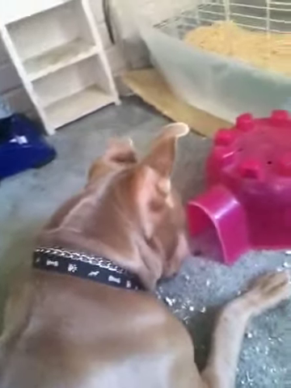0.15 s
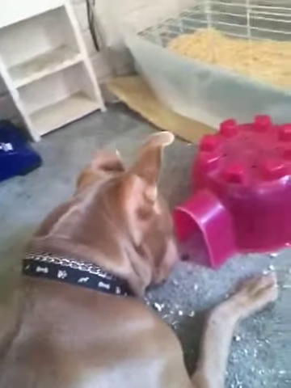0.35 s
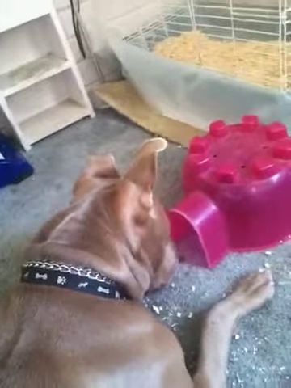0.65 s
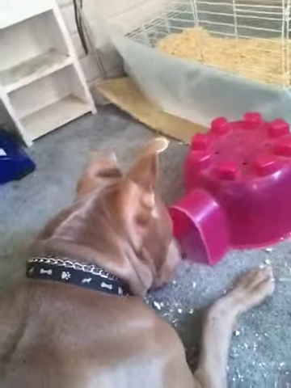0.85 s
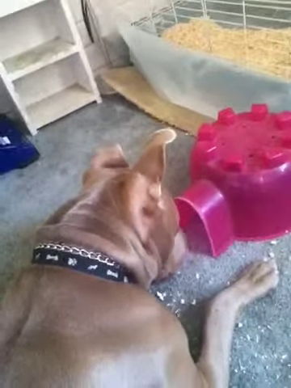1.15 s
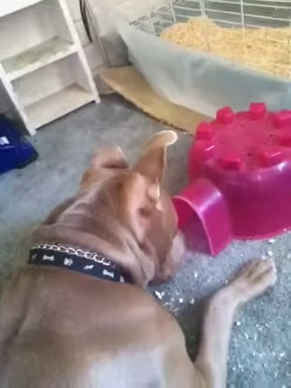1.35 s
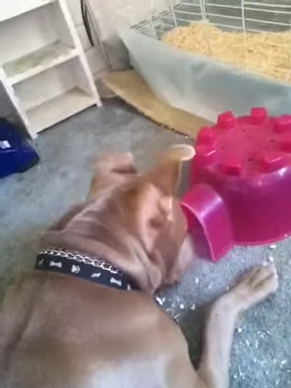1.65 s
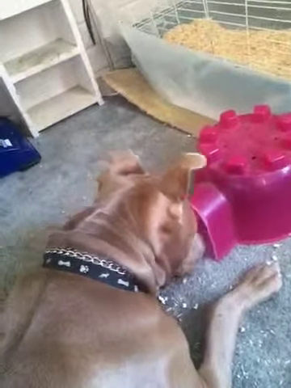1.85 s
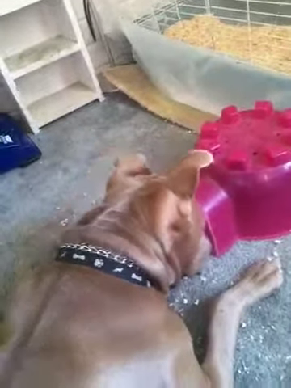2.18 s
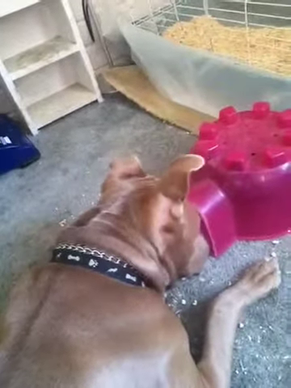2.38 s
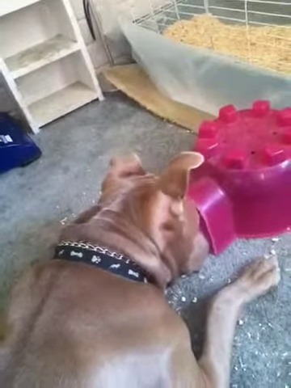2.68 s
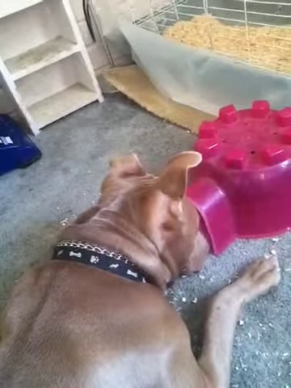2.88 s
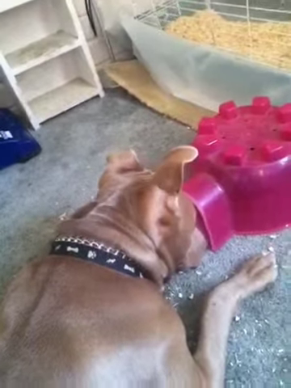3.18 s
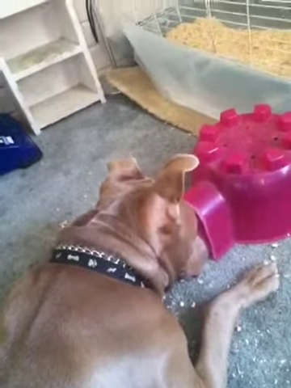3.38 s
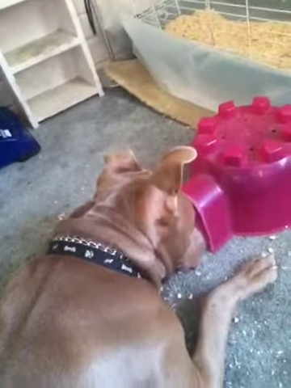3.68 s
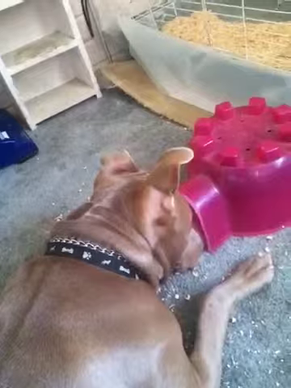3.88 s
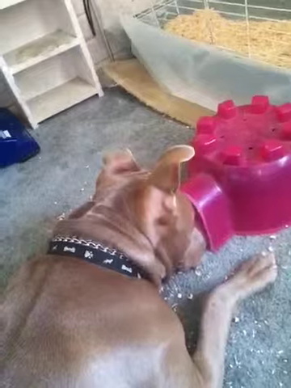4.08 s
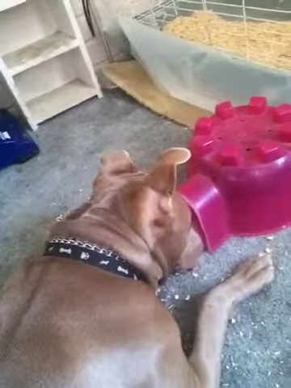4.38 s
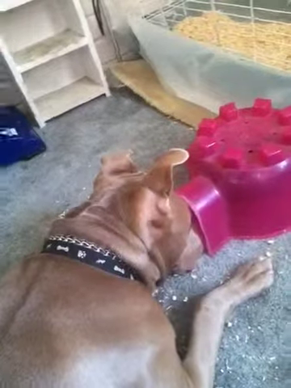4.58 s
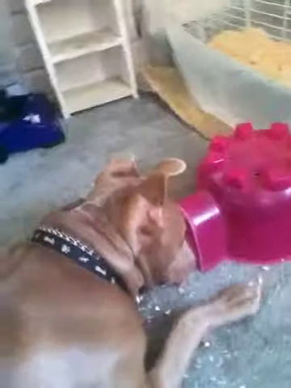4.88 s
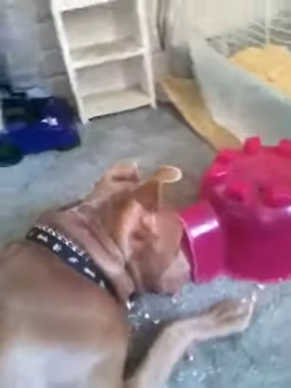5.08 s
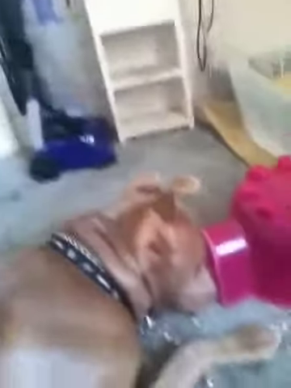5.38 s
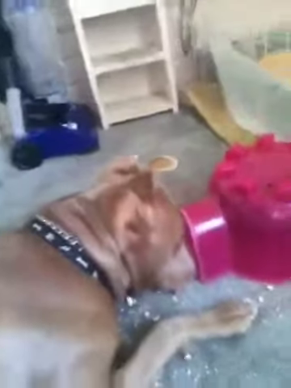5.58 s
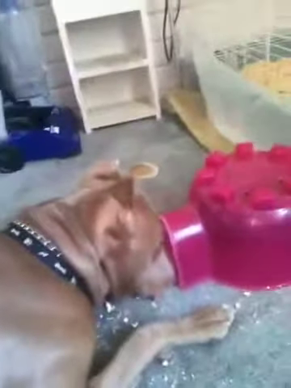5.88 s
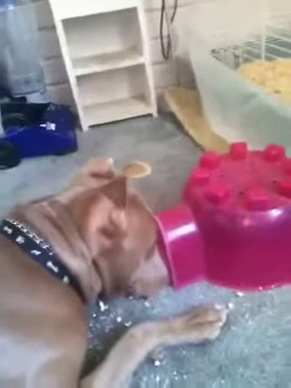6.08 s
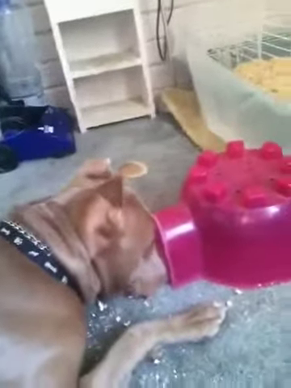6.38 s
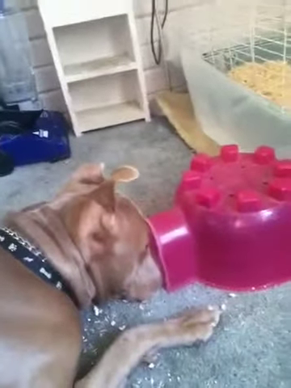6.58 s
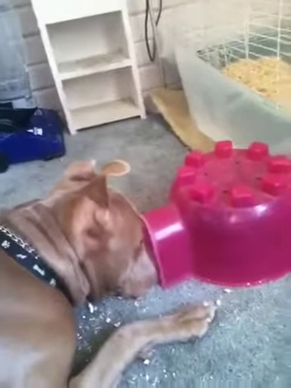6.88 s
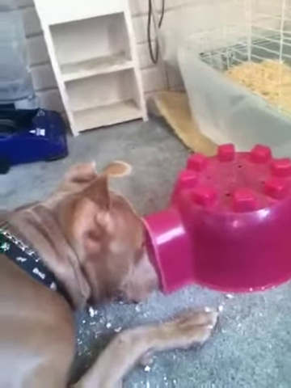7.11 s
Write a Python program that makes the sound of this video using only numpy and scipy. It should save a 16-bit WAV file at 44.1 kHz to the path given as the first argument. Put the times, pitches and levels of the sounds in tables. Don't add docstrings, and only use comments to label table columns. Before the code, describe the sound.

A low mains hum with a gentle throb about twice a second runs throughout, with soft fan air, slight hiss and a faint drone that swells and fades. A guinea pig inside a plastic hut calls in short bursts, coloured by a boxy ring and small hard room. Quiet whistles and chutters begin around 0.4 s, with two hoarse, breathy squeals at 0.75 to 0.9 s. A brighter cluster at 1.35 to 1.7 s peaks in a sharp falling whistle. Softer peeps come near 2.3 to 2.5 s, strong falling squeaks around 3.0 s, more at 3.85 to 4.05 s, and a loud tight group at 4.45 to 4.6 s. At 5.15 to 5.7 s the phone is handled: dry ticks, low knocks, cloth rustle, and the hum's balance shifts. Whistles return at 5.85 to 6.15 s, a faint tick at 6.35 s, then mostly hum with faint peeps near 7.15 s.

```python
import sys
import numpy as np
from scipy import signal
from scipy.fft import rfft, irfft, next_fast_len
from scipy.io import wavfile
from scipy.ndimage import uniform_filter1d

SR = 44100
rng = np.random.default_rng(int(sys.argv[2]) if len(sys.argv) > 2 else 0)


def linear_from_db(decibels):
    return 10 ** (np.asarray(decibels, float) / 20)


def store_pcm(level_fs):
    pcm = np.round(np.clip(level_fs, -1, 1) * 32767).astype(np.int16)
    wavfile.write(sys.argv[1], SR, np.atleast_2d(pcm).T)


N = 319715


def shape(x, points):
    hz, db = np.transpose(points)
    size = next_fast_len(len(x))
    f = np.maximum(np.fft.rfftfreq(size, 1 / SR), 1)
    gain = linear_from_db(np.interp(np.log(f), np.log(hz), db))
    return irfft(rfft(x, size) * gain, size)[:len(x)]


def unit(x):
    return x / np.sqrt(np.mean(x ** 2))


def band(x, lo_hz, hi_hz):
    return signal.sosfilt(signal.butter(4, [lo_hz, hi_hz], "bandpass", fs=SR, output="sos"), x)


def walk(rate_hz):
    k = max(int(SR / rate_hz), 2)
    smooth = uniform_filter1d(rng.standard_normal(N), k)
    return unit(uniform_filter1d(smooth, k))


def motor():
    buzz_hz, slip_hz, first_dip_s = 120.01, 1.92, .74
    # (multiple of the buzz, level before the phone moves [dB], level after [dB],
    # throb depth [0-1], throb lag [turns])
    hum_lines = [(1, -56, -55, 0.24, 0.), (2, -55, -56.5, 0.12, 0.089), (3, -59.5, -58.5, 0.15, 0.38),
                 (4, -68, -56, 0, 0), (5, -72, -85, 0.6, 0.026), (6, -69.5, -79, 0.07, 0.023),
                 (8, -75, -83, 0, 0.034), (9, -73.5, -72.5, 0, 0.082)]
    # (frequency [Hz], level [dB])
    whines = [(139.35, -69), (340.7, -73), (14998, -95)]
    t = np.arange(N) / SR
    moved = np.clip((t - 5.15) / 0.35, 0, 1)
    out = np.zeros(N)
    for k, before_db, after_db, depth, lag in hum_lines:
        turn = np.pi * (slip_hz * (t - first_dip_s) - lag)
        dips = 1 - 3.2 * np.cos(turn) ** 6
        throb = 1 + depth * (1 - .3 * moved) * dips
        db = before_db + (after_db - before_db) * moved + 1.1 * walk(18)
        out += linear_from_db(db) * throb * np.sin(2 * np.pi * k * buzz_hz * t)
    for hz, db in whines:
        out += linear_from_db(db + 2.9 * walk(8.9)) * np.sin(2 * np.pi * hz * t)
    return np.sqrt(2) * out


def air():
    # (frequency [Hz], density [dB per Hz])
    air_colour = [(25, -29.5), (55, -24), (95, -14), (160, -4), (260, 0), (420, -4), (650, -7), (1000, -8),
                  (1600, -14), (2400, -19), (3500, -19), (4300, -28), (7000, -28.5), (10500, -37.5),
                  (15400, -46.5)]
    low = shape(shape(rng.standard_normal(N), air_colour), [(700, 0), (1400, -30)])
    high = shape(shape(rng.standard_normal(N), air_colour), [(500, -4.5), (1000, -2)])
    return linear_from_db(-53.5) * unit(low * linear_from_db(.7 * walk(3)) + high * linear_from_db(.5 * walk(6.2)))


def rumble():
    # (peak time [s], half length [s], level [dB])
    drone_swells = [
        (.35, 0.39, -64),
        (.86, .1, -68),
        (1.8, 0.49, -69),
        (4.3, 0.98, -72),
        (5.3, .3, -67),
        (5.78, 0.23, -66.5),
        (6.85, .35, -69),
    ]
    t = np.arange(N) / SR
    level = np.full(N, linear_from_db(-81.5))
    for peak_s, half_s, db in drone_swells:
        level += linear_from_db(db) * np.exp(-((t - peak_s) / half_s) ** 2)
    hz = 86 + 2.5 * walk(6)
    return level * linear_from_db(2.5 * walk(9)) * np.sin(2 * np.pi * np.cumsum(hz) / SR)


def sag(rows, ratio):
    return [(s, length, hz, hz * ratio, db) for s, length, hz, db in rows]


def add_octave(rows, octave):
    octave_db_per_db, mean_effort_db = 0.18, -42.5
    # (time [s], overtone gain [dB])
    mouth = [(.4, -3.5), (.7, 1.5), (1.4, 0.5), (1.58, 2.5), (2.3, 0), (2.5, 0), (3.0, -4), (3.25, -5),
             (3.9, 2), (4.05, -7), (4.47, 0.5), (4.7, -12), (5.9, -1), (6.1, 0.5)]
    mouth_s, mouth_db = np.transpose(mouth)
    hz, octave_db = np.transpose(octave)
    out = []
    for s, length, first_hz, last_hz, db in rows:
        by_pitch = np.interp((first_hz + last_hz) / 2, hz, octave_db)
        by_effort = octave_db_per_db * (db - mean_effort_db)
        by_mouth = np.interp(s, mouth_s, mouth_db)
        out.append((s, length, first_hz, last_hz, db, by_pitch + by_effort + by_mouth))
    return out


def voice(calls, first_shake, wobble, shake_hz, flutter_db, third_db, air_db):
    # (frequency [Hz], density [dB per Hz])
    breath_colour = [(900, -45.5), (1500, -36), (2300, -22.5), (3400, -6), (4100, -12.5), (4600, -8),
                     (6500, -6), (8500, -13.5), (11500, -24), (14500, -27)]
    shake, flutter = walk(shake_hz), flutter_db * walk(350)
    breath = unit(shape(rng.standard_normal(N), breath_colour))
    out = np.zeros(N)
    for s, length, first_hz, last_hz, db, octave_db in calls:
        i = int(s * SR)
        n = min(int(length * SR), N - i)
        here = slice(i, i + n)
        u = np.arange(n) / n
        loose = np.minimum(first_shake + 2.6 * u, 1)
        hz = first_hz + (last_hz - first_hz) / (1 + np.exp(-7.5 * (u - .48)))
        phase = 2 * np.pi * np.cumsum(hz * (1 + wobble * loose * shake[here])) / SR
        overtones = np.sin(2 * phase) + linear_from_db(third_db) * np.sin(3 * phase)
        tone = np.sin(phase) + linear_from_db(octave_db) * overtones
        sung = np.sqrt(2) * linear_from_db(loose * flutter[here]) * tone
        swell = np.sin(np.pi * u ** 0.76) ** 0.68
        out[here] += linear_from_db(db) * swell * (sung + linear_from_db(air_db) * loose * breath[here])
    return out


def whistles():
    # (start [s], length [s], first pitch [Hz], last pitch [Hz], level [dB])
    slides = [(.355, .07, 3506, 2700, -47.5), (.668, .031, 1900, 1640, -49), (1.392, .041, 2520, 3040, -48),
              (1.47, .026, 1900, 1480, -50.5), (1.556, .049, 4195, 2998, -32.5),
              (1.635, .031, 2790, 2290, -48), (2.23, 0.0375, 2860, 3390, -64), (2.51, .05, 2460, 1430, -51),
              (2.956, .066, 2970, 2710, -53), (2.99, .047, 4080, 3280, -35), (3.078, .05, 2690, 2125, -43),
              (3.105, .028, 1820, 1120, -53.5), (3.845, .022, 4080, 3640, -42.5),
              (3.86, .05, 2474, 2920, -43.5), (3.993, .025, 3280, 2860, -46.5),
              (4.035, .065, 3270, 2395, -53.5), (4.455, .033, 3900, 2760, -39),
              (4.462, .043, 3592, 3048, -35.5), (4.505, .064, 3523, 2858, -36),
              (4.55, .043, 2333, 1595, -49.5), (5.84, .067, 3850, 2560, -44),
              (5.925, .033, 2730, 2204, -43), (5.965, .036, 1750, 1350, -54),
              (6.085, .037, 2135, 1746, -48)]
    # (start [s], length [s], pitch [Hz], level [dB])
    peeps = [(.385, 0.056, 2764, -59.5), (.6, 0.028, 4820, -49), (.632, 0.049, 2590, -54),
             (1.337, .043, 3040, -53), (1.378, 0.039, 3790, -51), (1.416, 0.045, 2157, -49),
             (1.533, 0.053, 4290, -37.5), (1.585, 0.045, 3080, -36.5), (1.695, .017, 1470, -53),
             (1.8, 0.016, 1525, -57.5), (2.318, 0.021, 1830, -58), (2.44, 0.021, 1926, -48.5),
             (2.47, 0.064, 4090, -44.5), (2.977, 0.027, 4430, -43), (3.01, 0.049, 3140, -38.5),
             (3.218, 0.018, 4140, -54), (3.235, 0.054, 2330, -54.5), (3.858, 0.039, 3690, -52),
             (3.85, 0.027, 4180, -53), (3.895, .044, 2120, -51.5), (3.975, 0.036, 2730, -54),
             (4.436, 0.063, 3976, -34), (4.675, 0.025, 3590, -48.5), (4.748, 0.017, 2750, -51),
             (5.89, 0.056, 3005, -35), (5.945, .027, 2300, -44), (6.066, 0.043, 3504, -44),
             (6.085, 0.044, 3850, -41), (6.14, 0.031, 3090, -42), (7.19, .032, 2375, -59)]
    # (start [s], length [s],
    # first pitch [Hz], last pitch [Hz], level [dB])
    reedy = [
        (2.418, .054, 2930, 3250, -52),
        (4.478, 0.036, 1600, 1620, -54.5),
        (1.59, .05, 2950, 2850, -52.5),
    ]
    # (start [s], pitch [Hz], level [dB])
    pips = [(.47, 2380, -62), (.49, 3440, -60.5), (1.695, 2390, -58), (2.115, 2290, -64),
            (2.283, 4420, -56.5), (2.296, 2770, -61.5), (2.5, 2200, -52), (3.01, 2356, -58),
            (3.81, 3090, -60), (3.94, 1650, -60.5), (4.09, 2380, -56.5), (4.55, 2940, -54),
            (2.17, 1547, -64.5), (5.17, 3840, -61), (7.12, 3130, -65)]
    # (pitch [Hz], level [dB])
    whistle_octave = [(1650, -2.5), (2100, -15), (2500, -24.5), (3300, -20.5), (4200, -19.5)]
    # (pitch [Hz], level [dB])
    reedy_octave = [(1600, 19), (3000, -3.5)]
    pip_s, peep_sag = .035, 0.97
    pip_rows = [(s, pip_s, hz, db) for s, hz, db in pips]
    calls = add_octave(slides, whistle_octave) + add_octave(reedy, reedy_octave)
    calls += add_octave(sag(peeps, peep_sag) + sag(pip_rows, peep_sag), whistle_octave)
    return voice(calls, first_shake=0.088, wobble=0.0317, shake_hz=386,
                 flutter_db=5.0, third_db=-12.5, air_db=-31.5)


def rasps():
    # (start [s], length [s], first pitch [Hz], level [dB])
    chutters = [(.561, .014, 2135, -46.5), (.365, 0.055, 3300, -58.5), (.562, .03, 3935, -54.5),
                (.59, 0.058, 4400, -57), (.675, 0.033, 3410, -51.5), (.75, 0.053, 2180, -50),
                (.83, 0.07, 2420, -50.5), (1.42, 0.071, 2880, -57.5), (1.575, .07, 3804, -41.5),
                (6.12, .06, 3680, -54), (2.31, 0.057, 3540, -55.5), (2.33, .028, 2270, -55),
                (2.455, 0.045, 2413, -49), (2.45, 0.079, 3400, -54.5), (2.52, 0.065, 2514, -54.5),
                (2.956, 0.038, 3520, -60), (2.99, 0.097, 3540, -43.5), (3.095, 0.047, 2415, -51),
                (3.235, .04, 3496, -54), (3.87, 0.11, 2535, -55.5), (3.88, 0.033, 4120, -60),
                (4.038, .035, 3890, -50), (4.06, 0.071, 2740, -53), (4.46, 0.066, 3285, -45),
                (4.548, .036, 3000, -38), (4.7, .038, 2780, -53), (5.175, 0.044, 3340, -53),
                (5.95, 0.033, 2253, -51), (6.085, 0.055, 2510, -52.5), (7.165, .042, 2940, -64)]
    # (pitch [Hz], level [dB])
    rasp_octave = [(2000, 1), (2500, -10), (3300, -11.5), (4000, -26)]
    calls = add_octave(sag(chutters, .83), rasp_octave)
    return voice(calls, first_shake=0.93, wobble=.17, shake_hz=602,
                 flutter_db=3.5, third_db=-13, air_db=-20.0)


def squeals():
    # (start [s], length [s], first pitch [Hz], last pitch [Hz], level [dB], octave overtone [dB])
    squeal_calls = [
        (.742, 0.077, 3030, 3393, -47.5, 5),
        (.812, 0.078, 3420, 3620, -38, 14.5),
    ]
    return voice(squeal_calls, first_shake=1, wobble=0.0324, shake_hz=500,
                 flutter_db=2.0, third_db=-17.5, air_db=8.5)


def room(x):
    hut_t60_s, room_t60_s, wall_s = 0.089, 0.31, 0.0085
    direct_db, room_db = -3.5, -4.5
    # (frequency [Hz], gain [dB])
    doorway = [(1000, 4.5), (2000, 0), (2600, 3.5), (3200, 5), (4100, -5.5), (4900, -12.5), (5600, -3.5),
               (6500, -5), (9000, -2), (12000, -14.5), (15000, -23)]
    t = np.arange(int(.7 * SR)) / SR
    hut = rng.standard_normal(len(t)) * 1000. ** (-t / hut_t60_s)
    walls = rng.standard_normal(len(t)) * 1000. ** (-t / room_t60_s) * (1 - np.exp(-t / wall_s))
    walls = shape(walls, [(1500, -6.5), (3000, -5.5), (8000, -8), (14000, -6.0)])
    echo = hut / np.linalg.norm(hut) + linear_from_db(room_db) * walls / np.linalg.norm(walls)
    echo[0] += linear_from_db(direct_db)
    spread = rfft(echo)
    average = np.sqrt(uniform_filter1d(np.abs(spread) ** 2, size=210))
    echo = irfft(spread / average, len(echo))[:len(echo) * 3 // 4]
    return signal.fftconvolve(shape(x, doorway), echo / np.linalg.norm(echo))[:N]


def rustle():
    # (start [s], held [s], level [dB], hiss under it [dB])
    drags = [
        (5.155, 0.073, -49, -16),
        (5.27, 0.046, -60.5, -6),
        (5.555, 0.084, -54.5, -10.5),
    ]
    attack_s, fade_db_per_s = 0.0095, 111
    scrape_db, scrape_dulls_db_per_s = -4.5, 50
    t, out = np.arange(N) / SR, np.zeros(N)
    grain = linear_from_db(1.9 * walk(120))
    hiss = unit(band(rng.standard_normal(N) * grain, 4340, 8600))
    scrape = unit(band(rng.standard_normal(N) * grain, 1900, 3200))
    thud = unit(band(rng.standard_normal(N) * grain, 300, 1320))
    for s, held, db, hiss_db in drags:
        since = np.maximum(t - s, 0)
        fade = linear_from_db(db - fade_db_per_s * np.maximum(since - held, 0))
        drag = np.minimum(since / attack_s, 1) * fade
        dulled = linear_from_db(scrape_db - scrape_dulls_db_per_s * since) * scrape
        out += drag * (thud + linear_from_db(hiss_db) * hiss + dulled)
    return out


def ticks():
    # (time [s], peak level [dB], low knock over snap [dB])
    contacts = [
        (5.1629, -41, 8),
        (5.183, -46, -6),
        (5.22, -55, 13),
        (5.2794, -41, -2),
        (5.565, -59, 3),
        (5.594, -52, 4),
        (5.647, -56, 12),
        (6.046, -58, -6),
        (6.348, -61, 14),
    ]
    out, u = np.zeros(N), np.arange(600) / SR
    for s, db, low_db in contacts:
        i = int(s * SR)
        snap = band(rng.standard_normal(len(u)) * np.exp(-u / 0.001), 4400, 10300)
        knock = band(rng.standard_normal(len(u)) * np.exp(-u / 0.0037), 180, 2000)
        tick = snap / np.abs(snap).max() + linear_from_db(low_db) * knock / np.abs(knock).max()
        out[i:i + len(u)] += linear_from_db(db) * tick
    return out


def scene():
    background = motor() + air() + rumble()
    pet = room(whistles() + rasps() + squeals())
    return (background + pet + rustle() + ticks())[None, :]


def band_limit(x):
    return signal.sosfilt(signal.butter(12, 15610, fs=SR, output="sos"), x)


def record(dry):
    low_pass = signal.ellip(8, .2, 60, 15600, fs=SR, output="sos")
    mix = signal.sosfilt(low_pass, dry)
    return band_limit(mix)


dry = scene()
out = record(dry)
store_pcm(out)
```